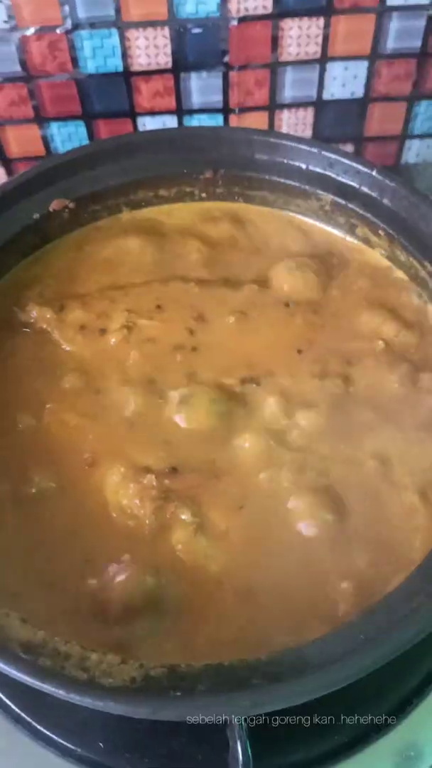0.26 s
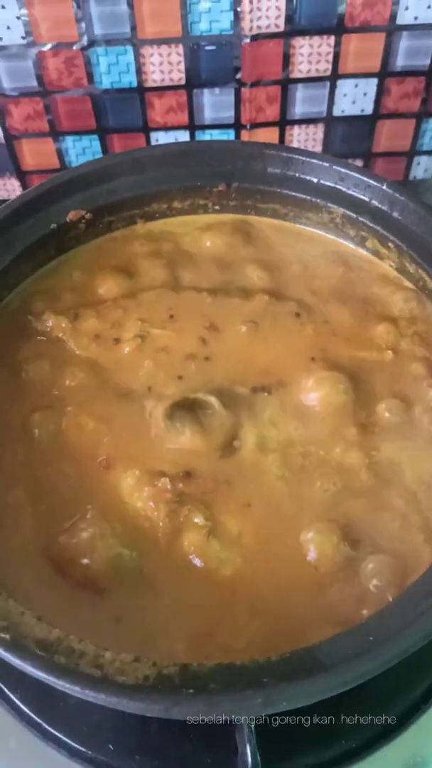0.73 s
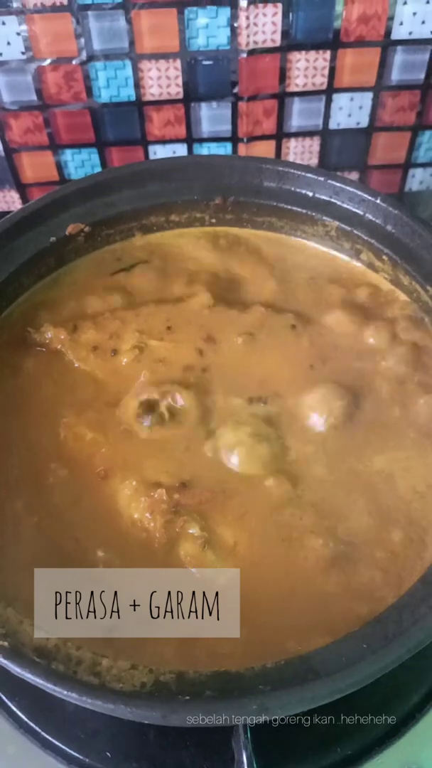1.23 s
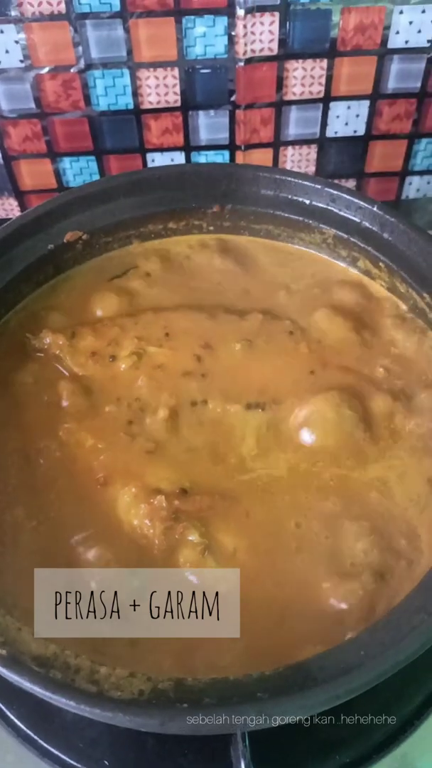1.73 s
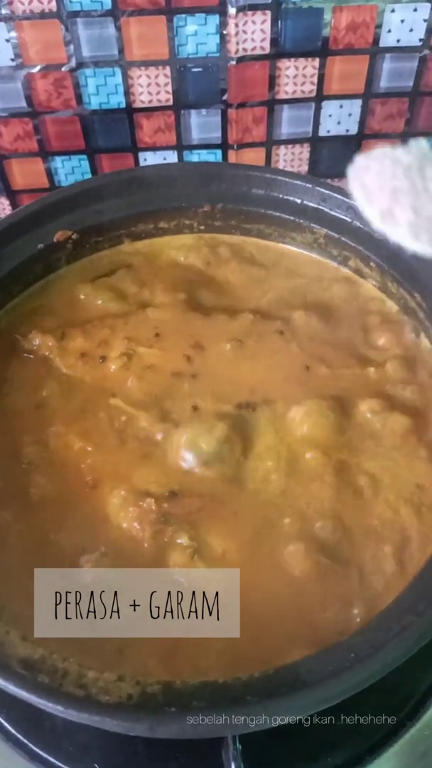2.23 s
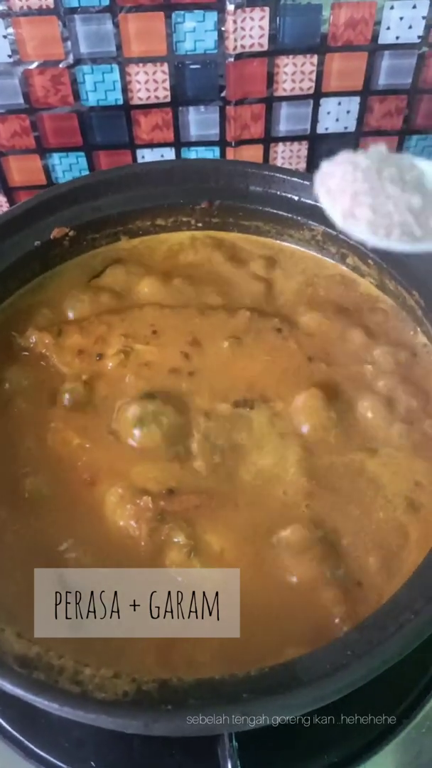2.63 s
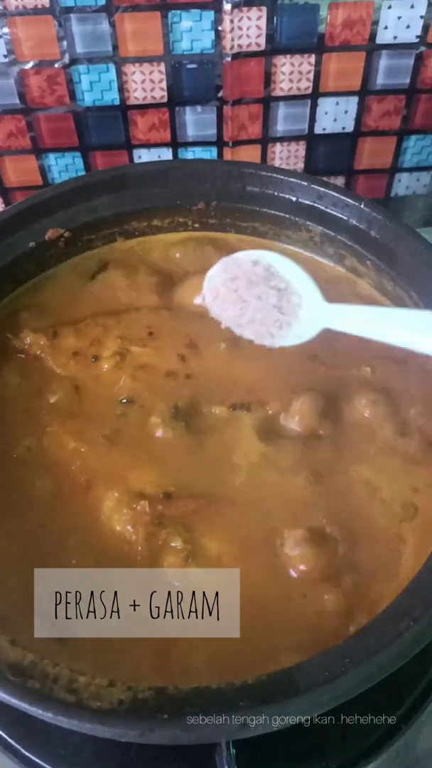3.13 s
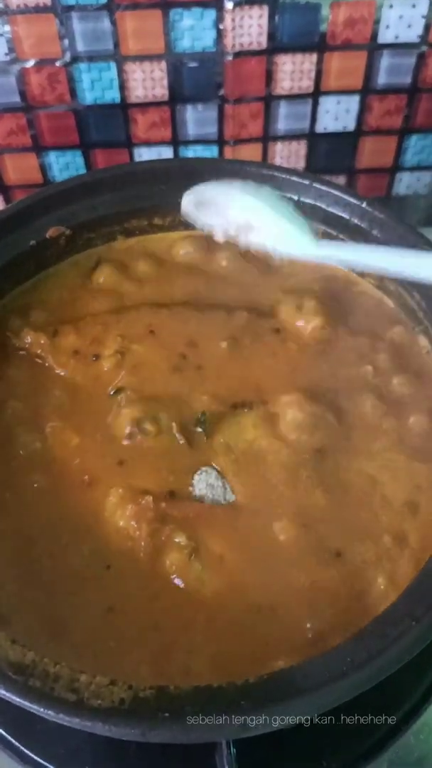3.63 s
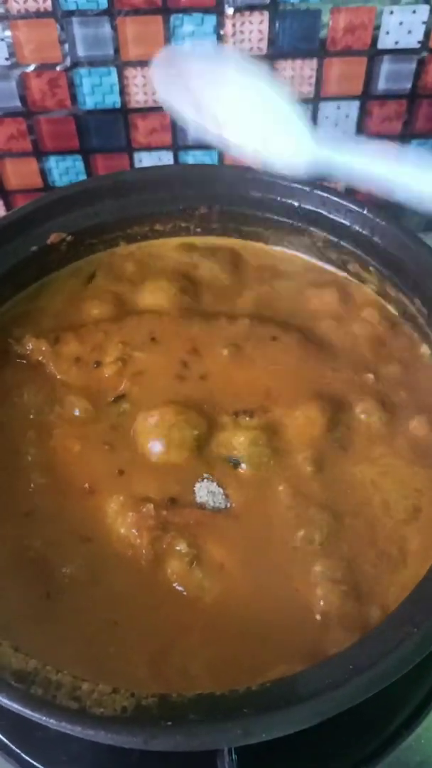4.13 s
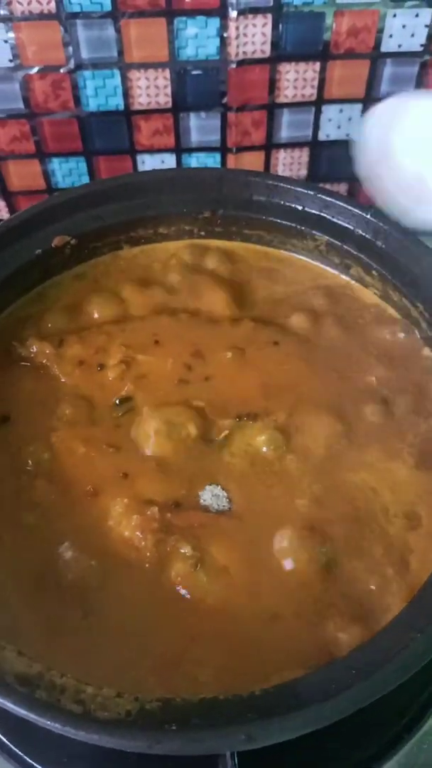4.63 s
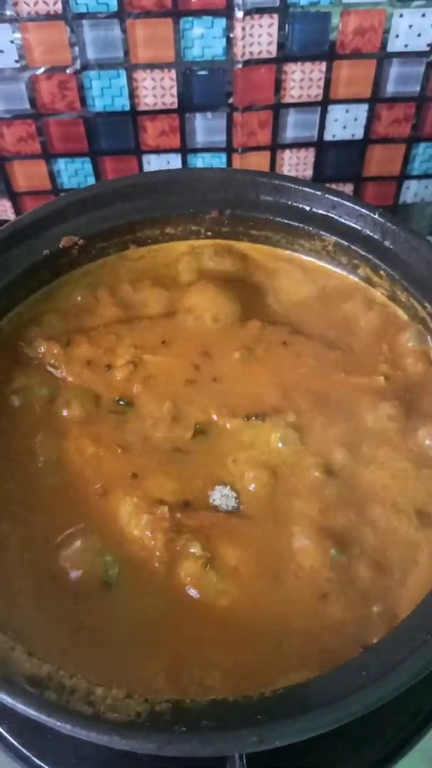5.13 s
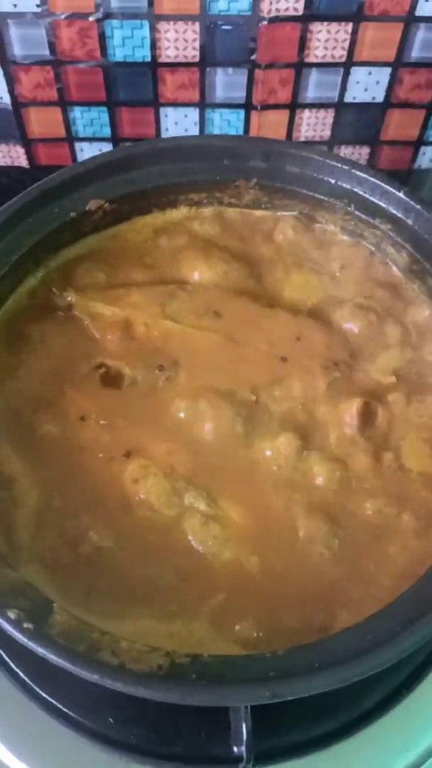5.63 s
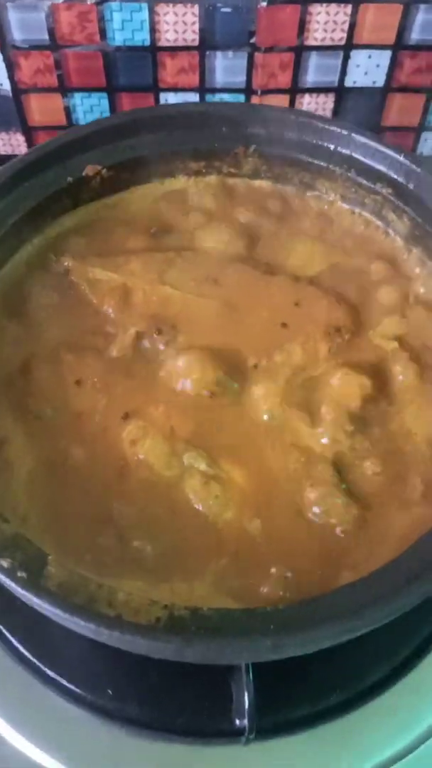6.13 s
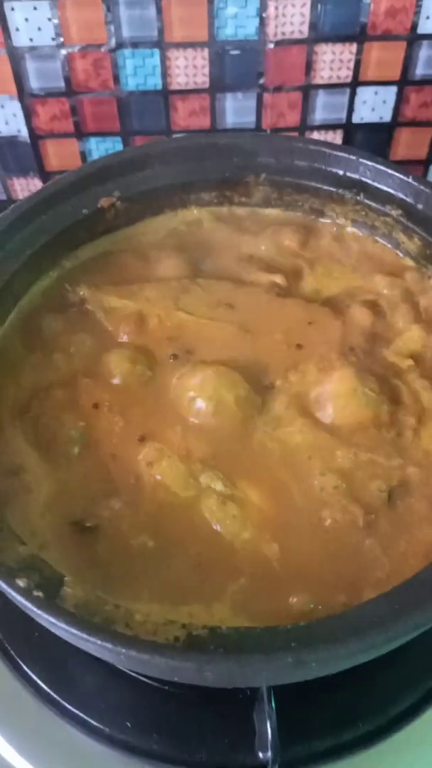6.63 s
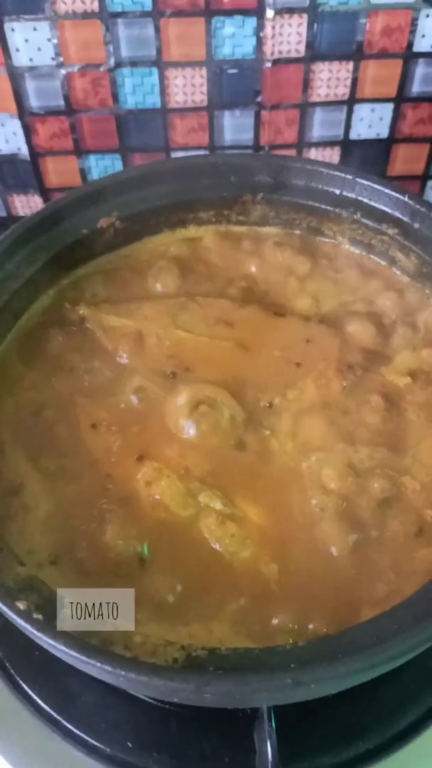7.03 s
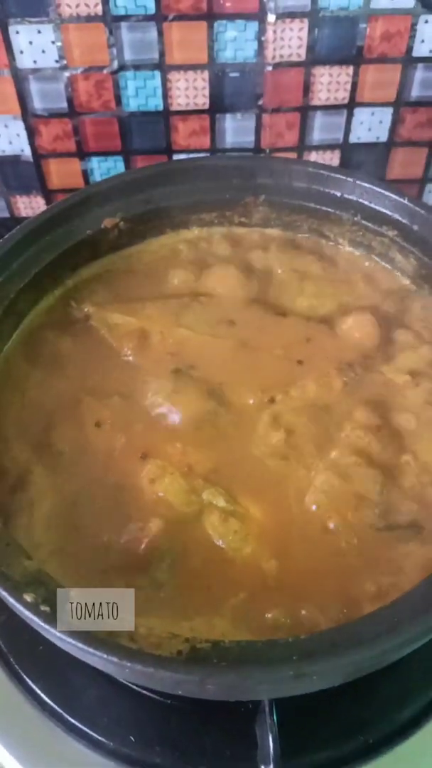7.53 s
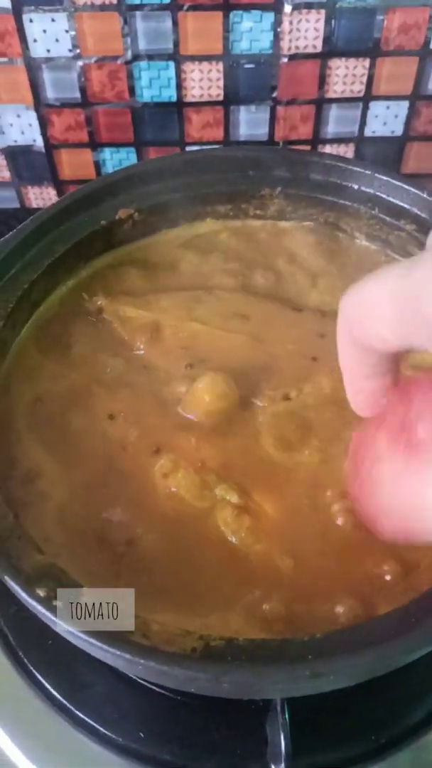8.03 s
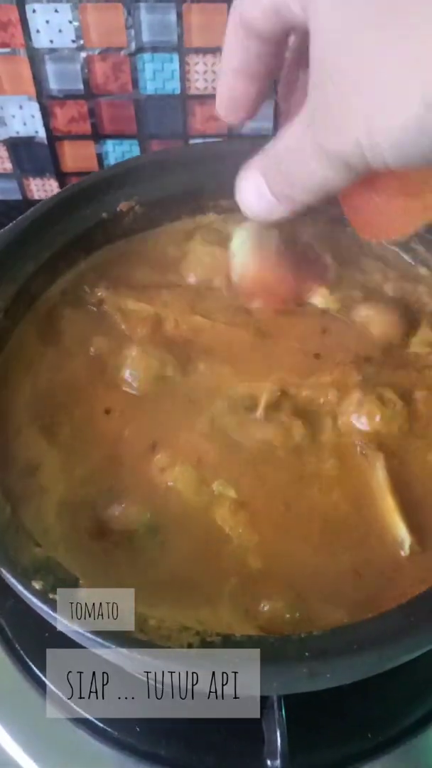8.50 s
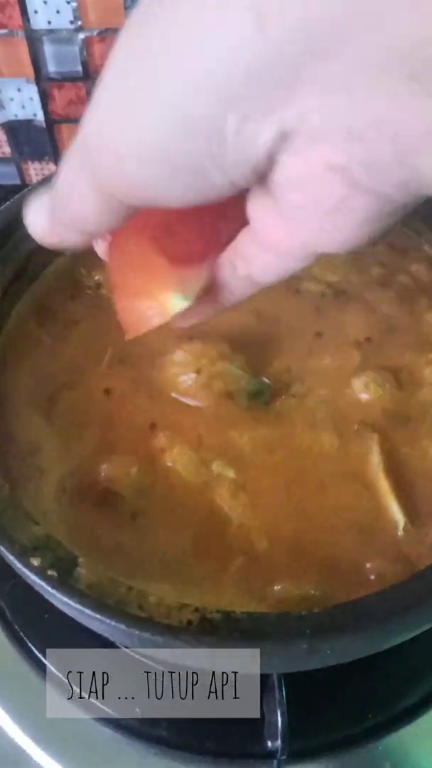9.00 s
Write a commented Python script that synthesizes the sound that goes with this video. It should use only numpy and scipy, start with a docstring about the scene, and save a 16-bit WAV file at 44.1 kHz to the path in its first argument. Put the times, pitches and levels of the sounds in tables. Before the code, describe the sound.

From 0 to 0.07 seconds there is only a scrap of soft, muffled low rumble, the pot still covered; then complete silence until 0.6. The sound cuts in abruptly with thick curry boiling hard in the open clay pot, very close. Irregular wet pops, several each second, snap from mid to high pitch, each with a tiny puff of steam and scattered droplets. Duller, hollow plops rise quickly in pitch between them, and fine crackling spits come in flurries, notably around 2.1. A low, uneven churning rumble runs beneath, with faint steady hiss and hum. At 5.2 everything cuts to silence. At 5.76 the boil returns just as suddenly, its spitting thinner and more uneven, with strong pops near 7.2 and 8.9, continuing until the end at 9.3. The stereo is wide, with short pot echoes and a light tiled-kitchen reverberation.

```python
"""Curry boiling in a clay pot

Thick curry boils in an open clay pot, close to a two-port microphone in a tiled kitchen.
Plops and pops are decaying sines of rising pitch with a noise tick; spits are swarms of tiny ones.
Filtered noise gives steam, hiss and rumble; resonances and decaying-noise echoes give pot and kitchen.
A moment with the lid on is followed by two stretches with it off, with silence between them."""
import sys
import numpy as np
from scipy import signal
from scipy.fft import rfft, irfft, next_fast_len
from scipy.io import wavfile
from scipy.ndimage import uniform_filter1d

SR = 44100
rng = np.random.default_rng(int(sys.argv[2]) if len(sys.argv) > 2 else 0)


def wrap_up_sound(samples):
    """Save the sound to the file named by the first command line argument, as 16-bit audio."""
    columns = np.atleast_2d(samples).T
    # keep every value between -1 and 1, then stretch to whole-number steps
    tamed = np.clip(columns, -1, 1)
    steps = np.round(tamed * 32767).astype(np.int16)
    wavfile.write(sys.argv[1], SR, steps)


N = 408366

# loud bubble skins bursting at the surface, levels before trims, room and ports:
# t/s, cavity f/Hz, burst level/dB, level of the flurry set off/dB
BURSTS = [(0.6118, 2320, -19, -24), (0.6249, 2350, -17.5, -33.5), (0.658, 5570, -16.5, -44),
          (0.8007, 4290, -21.5, -55), (0.9568, 1986, -13, -31), (1.1257, 2460, -18.5, -25.5),
          (1.1777, 4860, -19, -26), (1.2161, 2360, -19, -41), (1.3985, 5300, -22.5, -46),
          (1.5189, 2490, -20, -35), (1.6064, 2925, -15.5, -28), (1.6911, 4280, -20, -35),
          (1.8123, 2610, -23, -47), (1.8346, 2750, -23, -48), (1.8812, 4410, -20.5, -46),
          (1.9502, 3320, -25.5, -51), (2.0942, 4460, -19.5, -16.5), (2.1165, 5800, -21, -33),
          (2.1799, 6500, -23, -24), (2.4229, 2570, -14.5, -41), (2.6401, 6410, -19.5, -47),
          (2.745, 6860, -22, -48), (2.9129, 2975, -18, -42), (3.0155, 5390, -25.5, -46),
          (3.102, 5540, -18, -38), (3.3046, 4760, -21.5, -34), (3.4395, 2370, -19, -35),
          (3.5543, 6910, -22.5, -25), (3.634, 2460, -25.5, -27), (3.6733, 6070, -21, -36),
          (3.7334, 2400, -17, -32), (3.793, 2310, -23, -30.5), (3.8467, 5450, -21, -24),
          (3.9395, 2690, -21, -46), (3.9958, 4830, -18.5, -46), (4.0132, 5580, -21, -39),
          (4.177, 3230, -21, -24.5), (4.2319, 2790, -23, -46), (4.372, 3450, -19.5, -30),
          (4.5211, 2260, -17.5, -35), (4.6505, 2970, -17, -23.5), (4.7224, 6680, -25, -47),
          (4.7481, 3630, -22.5, -34), (4.9371, 5320, -16.5, -41), (5.1494, 5100, -19, -40),
          (5.1861, 5420, -23, -45), (5.7879, 4500, -26.5, -44), (5.847, 4540, -20, -30),
          (5.9194, 6730, -22, -55), (5.9802, 4230, -23, -38), (6.0579, 7050, -18, -32),
          (6.1959, 1770, -21, -37), (6.2738, 6400, -18, -39), (6.338, 4220, -24.5, -37),
          (6.4021, 6390, -24, -46), (6.4543, 6970, -25.5, -46), (6.615, 6660, -21, -48),
          (6.8023, 4000, -22, -34), (6.8268, 7400, -18.5, -43), (6.8719, 6160, -23.5, -35),
          (6.899, 6600, -19.5, -28), (7.095, 2250, -16.5, -56), (7.1833, 1870, -13.5, -41),
          (7.262, 7050, -25, -53), (7.4056, 2390, -21.5, -42), (7.6307, 2240, -21.5, -37),
          (7.671, 4800, -23.5, -47), (7.7208, 5600, -20.5, -40), (7.8633, 7160, -24.5, -52),
          (7.979, 6970, -21, -35), (8.0163, 4390, -24.5, -35), (8.101, 1960, -24, -35),
          (8.198, 5370, -25.5, -45), (8.2448, 1820, -28.5, -54), (8.4542, 5780, -23.5, -55),
          (8.78, 1920, -28, -54), (8.8324, 2320, -22.5, -44), (8.88, 1920, -15, -36),
          (8.9822, 6190, -20, -32.5), (9.2327, 4630, -25, -40)]


def amp(db):
    """Level to amplitude: 20 dB is a factor of ten."""
    return 10 ** (np.asarray(db) / 20)


def unit(x):
    """Normalisation to a root-mean-square of 1."""
    return x / np.sqrt(np.mean(x ** 2) + 1e-20)


def along(points, hz):
    """Linear interpolation of (f/Hz, value) points on a logarithmic frequency axis."""
    f, value = np.transpose(points)
    return np.interp(np.log(hz + 1), np.log(f + 1), value)


def filtered(x, response):
    """Linear filtering: the spectrum of x times a response of frequency."""
    m = next_fast_len(N + SR // 2)
    spectrum = rfft(x, m) * response(np.fft.rfftfreq(m, 1 / SR))
    return irfft(spectrum, m)[..., :N]


def resonant(x, modes):
    """Modal superposition: x plus its response in each (f/Hz, width/Hz, gain/dB) resonance."""
    def response(f):
        return 1 + sum(amp(db) * 1j * f * w / (c * c - f * f + 1j * f * w) for c, w, db in modes)

    return filtered(x, response)


def noise(spectrum, channels):
    """Coloured noise: uncorrelated channels of the given spectral density, jointly at rms 1."""
    white = rng.standard_normal((channels, N))
    return unit(filtered(white, lambda hz: amp(along(spectrum, hz))))


def bubbles(s, hz, db, swell_ms, rise, tear, softness, size, lead_ms=0.22, spread_ms=0.098):
    """Cavity resonance: each ring swells, decays and rises in pitch as its hole widens; tearing adds a tick.
    Low softness makes the attack abrupt and the tail longer."""
    place, phase, side = rng.standard_normal((3, len(s), 1))
    index = (s * SR).astype(int)[:, None] + np.arange(size)
    # a wet skin tears softly: the noise is smoothed
    tick = 1.6 * uniform_filter1d(rng.standard_normal((len(s), size)), size=3, axis=1)
    swell = swell_ms[:, None] / 1000
    ports = []
    for sign in (1, -1):
        # the place in the pot sets how much sooner the left port hears it
        advance = sign * (lead_ms + spread_ms * place) / 2e3
        t = np.maximum(np.arange(size) / SR + advance - 2e-4, 0)
        u = t / swell
        glide = 1 + rise * np.tanh(u / 2 - 1)
        cycles = hz[:, None] * np.cumsum(glide * np.diff(t, prepend=0), axis=1)
        envelope = (u * np.exp(1 - u)) ** softness
        ring = envelope * np.sin(2 * np.pi * (cycles + phase))
        tearing = tear * tick * (t > 0) * np.exp(-t / 0.00055)
        wave = amp(db[:, None] + sign * side) * (ring + tearing)
        ports.append(np.bincount(index.ravel(), wave.ravel(), N)[:N])
    return np.array(ports)


def swarm(rate, low_hz, high_hz, cycles, scatter_db, tear, size):
    """Random superposition: many small bubbles of random pitch, breaking in pairs; rms 1."""
    count = int(rate * N / SR)
    when, pitch, life, strength, delay = rng.random((count, 5)).T
    pair_start = when[np.arange(count) // 2 * 2] * N / SR
    s = pair_start + .03 * delay
    hz = low_hz * (high_hz / low_hz) ** pitch
    swell_ms = 1000 * cycles * 2 ** (2 * life - 1) / hz
    return unit(bubbles(s, hz, scatter_db * strength, swell_ms, rise=0.019, tear=tear,
                        softness=0.23, size=size))


def plops(gulp_db=-10):
    """Cavity resonance of large pockets: a short, dull, rising note, then a weaker gulp as the sauce closes."""
    # large steam pockets opening low in the sauce, levels before room and ports:
    # t/s, f/Hz, peak level/dB, swell time/ms
    pockets = [(0.7755, 850, -22.5, 0.41), (0.9435, 800, -31.5, 1.8), (1.2484, 770, -23, 0.71),
               (1.2903, 1240, -20, 0.56), (1.6812, 850, -25.5, 1.7), (1.8109, 740, -29.5, 1.8),
               (2.0705, 1310, -20, 0.52), (2.3417, 930, -28, 1.5), (2.3782, 870, -27, 1.4),
               (2.6037, 860, -26, 0.62), (2.7103, 1100, -27, 1.6), (3.0238, 770, -26.5, 1.3),
               (3.1636, 910, -25, 0.39), (3.2138, 730, -30, 1.6), (3.3746, 1000, -22.5, 0.81),
               (3.5539, 824, -22.5, 0.74), (3.8111, 1130, -18, 0.44), (3.9318, 960, -25.5, 1.06),
               (4.1638, 760, -28, 1.5), (4.4584, 760, -22.5, 0.82), (4.4635, 251, -27, 4.6),
               (4.635, 850, -24, 0.66), (4.7351, 780, -30.5, 1.1), (4.8767, 1090, -29, 2),
               (4.9096, 900, -25, 1.3), (5.8856, 1010, -19, 0.51), (6.0397, 840, -30, 1.5),
               (6.1551, 826, -27.5, 1.15), (6.4855, 840, -23, 1.5), (6.5886, 1030, -28, 0.57),
               (6.7187, 880, -24.5, 1.4), (6.8638, 830, -26.5, 1.8), (7.1035, 930, -20.5, 2),
               (7.313, 990, -20, 0.47), (7.3502, 1120, -25.5, 0.5), (7.4375, 870, -27.5, 1.5),
               (7.6227, 840, -24, 0.78), (7.7275, 1070, -20, 0.46), (7.9108, 830, -28, 0.53),
               (8.0971, 920, -27, 0.9), (8.3312, 1330, -25, 0.99), (8.3555, 935, -30, 0.64),
               (8.5145, 930, -29.5, 0.75), (8.553, 880, -24.5, 0.8), (8.7232, 1040, -18.5, 0.46),
               (8.7565, 220, -30, 3.0), (8.7803, 900, -20.5, 0.45), (9.0114, 1160, -27.5, 1.0),
               (9.0918, 1060, -28.5, 0.88)]
    s, hz, db, swell_ms = np.transpose(pockets)
    delay, pitch = rng.random((len(s), 2)).T
    opening = bubbles(s, hz, db, swell_ms, rise=0.13, tear=0.098, softness=1.05, size=1200,
                      lead_ms=0.17, spread_ms=0.06)
    closing = bubbles(s + 0.00398 + 0.0091 * delay, hz * (.7 + 1.0 * pitch), db + gulp_db, .6 * swell_ms,
                      rise=0.093, tear=.1, softness=.9, size=1200, lead_ms=0.047)
    return opening + closing


def pops(spray_db=-14, spray_s=.007):
    """Film rupture: the burst cavity rings, then the torn film breaks into smaller pops of similar pitch."""
    s, hz, db, _ = np.transpose(BURSTS)
    # a 3 kHz cavity swells fully in 0.5 ms; larger, lower cavities take longer
    swell_ms = 0.5 * (3000 / hz) ** .2
    burst = bubbles(s, hz, db, swell_ms, rise=0.05, tear=0.41, softness=0.47, size=1000)
    parent = np.repeat(np.arange(len(s)), 4)
    delay, pitch, strength = rng.random((len(parent), 3)).T
    shred_s = s[parent] - spray_s * np.log(delay + 0.001)
    shred_hz = hz[parent] * (.82 + .5 * pitch)
    shred_db = db[parent] + spray_db + 6 * strength
    shreds = bubbles(shred_s, shred_hz, shred_db, np.full(len(parent), .25),
                     rise=0.025, tear=0.3, softness=0.3, size=300)
    return amp(-2.2) * burst + shreds


def puffs(puff_db=-37, puff_s=0.014):
    """Jet noise: every burst lets out a puff of steam whose amplitude decays exponentially."""
    # steam escaping from a burst bubble: f/Hz, relative density/dB per Hz
    steam = [(400, -8.5), (1500, -9.5), (2500, -0.5), (3400, 0), (4500, 8), (7000, 6.5), (10000, -5.5),
             (15000, -7.5)]
    s, _, db, _ = np.transpose(BURSTS)
    release = np.bincount((s * SR).astype(int), amp(puff_db + 0.39 * (db - db.mean())), N)[:N]
    jet = signal.lfilter([1], [1, -np.exp(-1 / (puff_s * SR))], release)
    return jet * noise(steam, channels=2)


def droplets(droplet_db=-22, flight_s=0.022):
    """Droplet impact: each burst throws two fine droplets that spit as they land."""
    s, _, db, _ = np.repeat(BURSTS, 2, axis=0).T
    delay, pitch = rng.random((2, len(s)))
    hz = 7800 * 1.55 ** pitch
    return bubbles(s + flight_s * delay ** 2, hz, db / 2 + droplet_db, np.full(len(s), .5),
                   rise=0.034, tear=.2, softness=0.45, size=400)


def boil(popping_flurry_db=-2.5, spitting_flurry_db=-2.5):
    """Addition of powers: a slow simmer plus an exponentially dying flurry after every loud burst."""
    # how hard it simmers between the loud bursts, before each layer's trim:
    # t/s, rumble level/dB, popping level/dB, spitting level/dB
    simmer_levels = [(0.7, -40.5, -44.5, -34.5), (2.3, -40.5, -38, -35), (2.55, -40.5, -35.5, -33.5),
                     (2.7, -39.5, -51, -36), (3.3, -41, -49.5, -37), (3.7, -39.5, -41, -36),
                     (4.1, -40, -46.5, -36), (4.5, -40, -48, -35.5), (5.1, -41.5, -43.5, -37),
                     (5.8, -40, -49, -44), (6.15, -44, -62, -50), (6.5, -41, -43.5, -39),
                     (7.4, -41, -58.5, -44), (7.65, -42, -47, -32.5), (7.85, -43, -59, -52.5),
                     (8.4, -43.5, -55.5, -46), (8.6, -41, -54.5, -37), (9.2, -42.7, -51, -43.5)]
    knots, *columns = np.transpose(simmer_levels)
    rumble_db, popping_db, spitting_db = [np.interp(np.arange(N) / SR, knots, c) for c in columns]
    s, hz, _, flurry_db = np.transpose(BURSTS)
    # low bursts set off mostly pops, high ones spits; a quarter of every flurry is always spitting
    low_share = (1 - .25) / (1 + (hz / 3500) ** 6)

    def stirred(simmer_db, share, gain_db, fade_s):
        """Exponential decay of power after each burst, added to the simmer's power."""
        kicks = np.bincount((s * SR).astype(int), share * amp(flurry_db + gain_db) ** 2, N)[:N]
        power = signal.lfilter([1], [1, -np.exp(-1 / (fade_s * SR))], kicks)
        return 10 * np.log10(amp(simmer_db) ** 2 + power)

    popping_db = stirred(popping_db, low_share, popping_flurry_db, fade_s=0.03)
    spitting_db = stirred(spitting_db, 1 - low_share, spitting_flurry_db, fade_s=0.017)
    return rumble_db, popping_db, spitting_db


def simmer(popping_db, spitting_db):
    """Superposed cavity rings all over the surface; the fizz at the hot rim follows the boil only loosely."""
    blips = swarm(rate=85, low_hz=540.5, high_hz=1807, cycles=0.46, scatter_db=13, tear=0.11, size=900)
    popping = swarm(rate=170, low_hz=2243, high_hz=4340, cycles=0.93, scatter_db=20.5, tear=0.29, size=500)
    spits = swarm(rate=220, low_hz=4140, high_hz=7593, cycles=0.82, scatter_db=35.5, tear=0.28, size=300)
    fizz = swarm(rate=900, low_hz=7890, high_hz=15500, cycles=2.2, scatter_db=8, tear=.1, size=200)
    return (amp(-48) * blips + amp(popping_db - 4.0) * popping + amp(spitting_db - 6.0) * spits
            + amp(.3 * spitting_db - 36.0) * fizz)


def rumble(rumble_db):
    """Bubble collapse: steam collapses at the bottom of the pot and thuds through the thick sauce."""
    # the boil at the bottom of the pot: f/Hz, relative density/dB per Hz
    churn_colour = [(20, -5), (40, -15.5), (90, -8), (145, -4), (190, 0.5), (240, -4.5), (310, -2),
                    (480, -11), (750, -7), (1100, -24), (2000, -26), (5000, -56)]
    # low resonances of pot, stove top and kitchen corner: f/Hz, width/Hz, gain/dB
    body = [(118.5, 8, -5), (148.2, 13, 4), (192, 20, 3.5), (230.9, 7.5, 7), (259.3, 43, 1),
            (314.3, 7.1, 2.5), (396.7, 15, 3), (463, 8.8, 4.5), (553.5, 12, 1.5)]
    churn = noise(churn_colour, channels=1)
    # the part that differs between the ports is weakest in the bass
    diffuse = filtered(noise(churn_colour, channels=2),
                       lambda hz: amp(along([(180, -19.5), (400, -3.0), (1000, -2)], hz)))
    thuds = swarm(rate=45, low_hz=169.0, high_hz=487, cycles=0.58, scatter_db=16.5, tear=.02, size=2600)
    return amp(rumble_db - 0.7) * unit(resonant(churn + diffuse + amp(-8) * thuds, body))


def stove():
    """Steady sources: a faint 60 Hz mains hum and stationary noise."""
    # steady hiss of stove and steam: f/Hz, relative density/dB per Hz
    hiss_colour = [(200, -8.5), (900, -3.5), (1600, -4.5), (4000, -19.5), (7000, -19), (11000, -10.5),
                   (16000, -21)]
    hum = amp(-59) * np.sin(2 * np.pi * 60 * np.arange(N) / SR)
    return hum + amp(-58.5) * noise(hiss_colour, channels=2)


def room(x, pot_db=-6, pot_t60=0.027):
    """Reverberation as decaying noise: quick echoes between pot wall and tiles, and the kitchen's tail."""
    # the kitchen's reverberation time: f/Hz, t60/s
    kitchen_t60 = [(200, 1.1), (1000, 0.64), (2200, 0.41), (6000, .6), (14000, 0.2)]
    # colour of the kitchen's answer: f/Hz, relative level/dB
    kitchen_db = [(200, -4.5), (900, -11.5), (1400, -4), (2300, -0.5), (5000, -2), (12000, -6.5)]
    hz, t, z = signal.stft(rng.standard_normal((2, SR // 2)), SR, nperseg=128)
    late = amp(-60 * t / along(kitchen_t60, hz)[:, None])
    late = late / np.linalg.norm(late, axis=1, keepdims=True)
    early = amp(-60 * t / pot_t60)
    shape = late + amp(pot_db) * early / np.linalg.norm(early)
    colour = amp(along(kitchen_db, hz))[:, None]
    tail = signal.istft(z * shape * colour, SR, nperseg=128)[1] / 8
    delayed = np.pad(tail, ((0, 0), (SR // 500, 0)))  # the echoes start 2 ms late
    return signal.fftconvolve(x, delayed, axes=1)[:, :N]


def scene():
    """Insulation by the lid: while on, it mutes the surface sounds and softens the rumble by 4 dB."""
    # air ringing between the sauce and the pot wall: f/Hz, width/Hz, gain/dB
    pot_air = [(867, 32, 3), (1131, 28, -9), (1928, 9.5, -4), (4286, 390, -3)]
    rumble_db, popping_db, spitting_db = boil()
    lid_on = np.arange(N) / SR < .5
    sources = plops() + pops() + puffs() + droplets() + simmer(popping_db, spitting_db)
    surface = resonant(sources, pot_air) * ~lid_on
    return surface + room(surface) + rumble(rumble_db - 4 * lid_on) + stove()


def record(dry):
    """Transducer response: each port colours the sound, gaps are silent and a steep low-pass limits the band."""
    # stretches that are heard: start t/s, end t/s
    stretches = [(0, .073), (.601, 5.213), (5.759, 9.3)]
    # colour of each microphone port: f/Hz, gain/dB
    left_port = [(400, 0.5), (1200, 3.5), (2500, 2), (4300, -1), (5500, -4), (6200, -14), (7000, -20.5),
                 (8000, -8.5), (9800, 4.5), (11200, -7.5), (12700, -2), (14500, -28)]
    right_port = [(400, 0), (1200, 0.5), (2500, 5), (4300, 0.5), (5500, 4), (6900, 8), (8000, -1.5),
                  (9000, -30), (10100, -25), (12300, -7), (13500, -8), (15400, 0)]
    t = np.arange(N) / SR
    heard = sum((t >= start) & (t < end) for start, end in stretches)
    coloured = filtered(dry, lambda hz: amp([along(left_port, hz), along(right_port, hz)]))
    return filtered(coloured * heard, lambda hz: 1 / (1 + (hz / 15800) ** 160))


dry = scene()
out = record(dry)
wrap_up_sound(out)
```